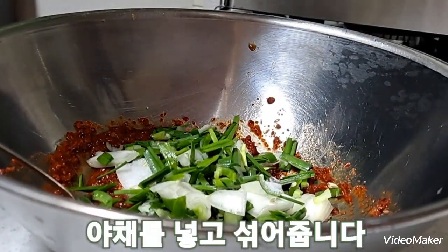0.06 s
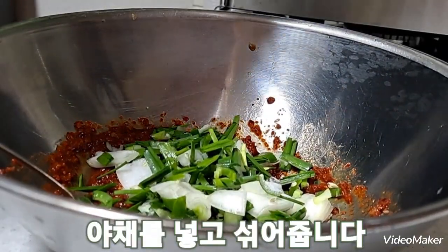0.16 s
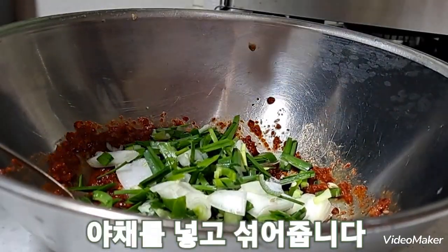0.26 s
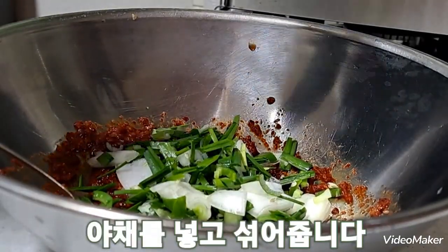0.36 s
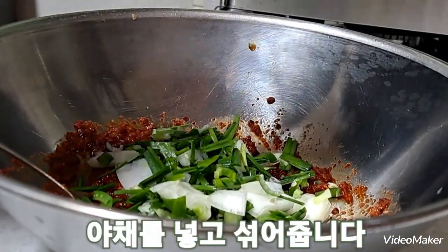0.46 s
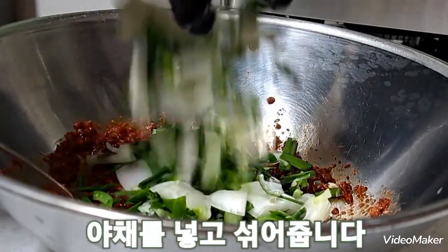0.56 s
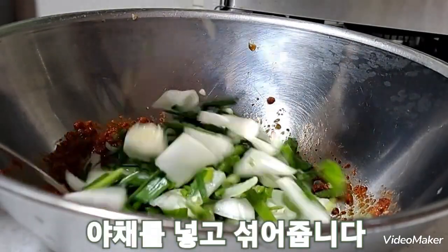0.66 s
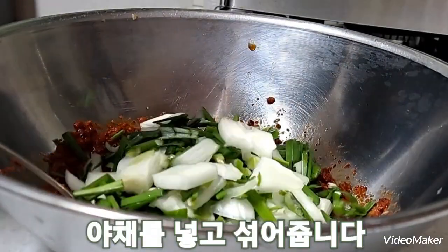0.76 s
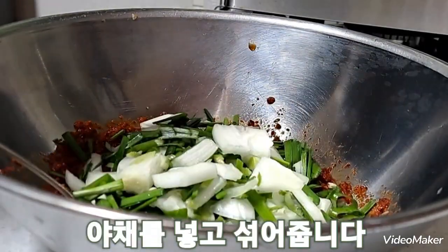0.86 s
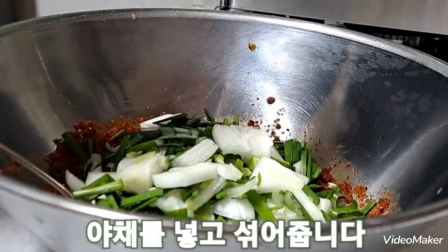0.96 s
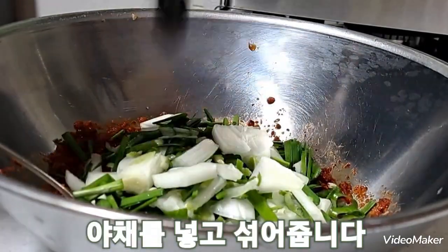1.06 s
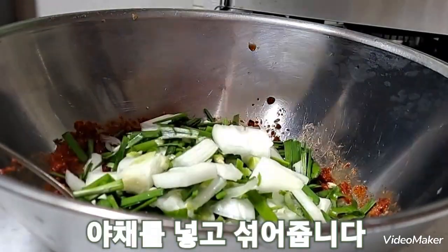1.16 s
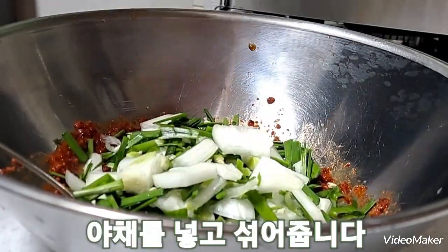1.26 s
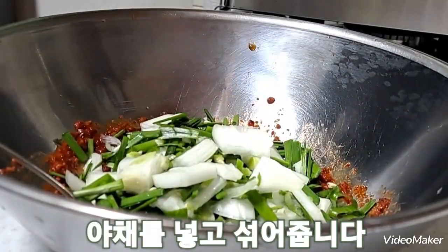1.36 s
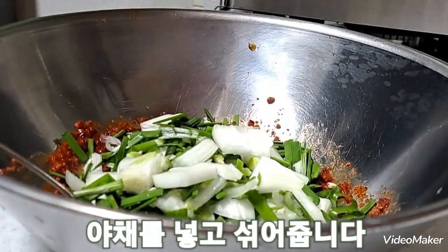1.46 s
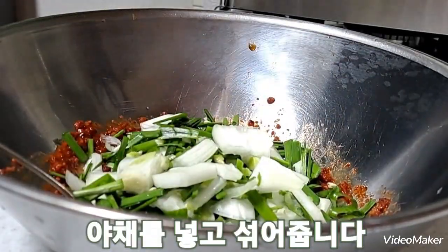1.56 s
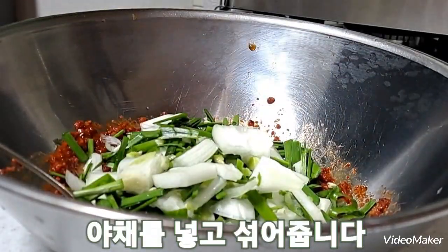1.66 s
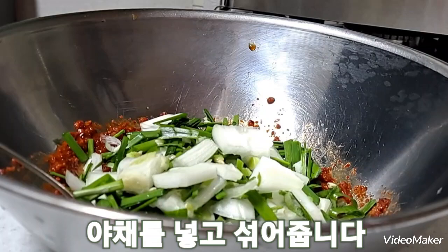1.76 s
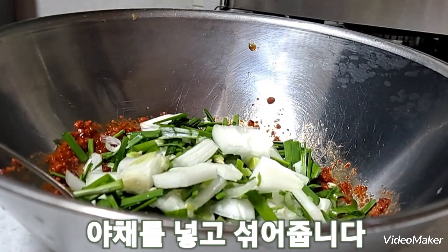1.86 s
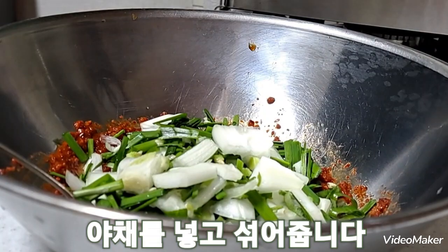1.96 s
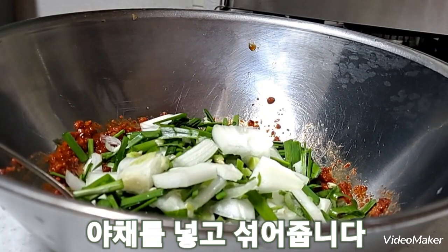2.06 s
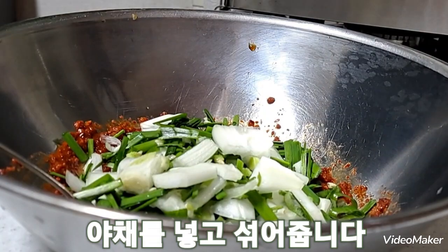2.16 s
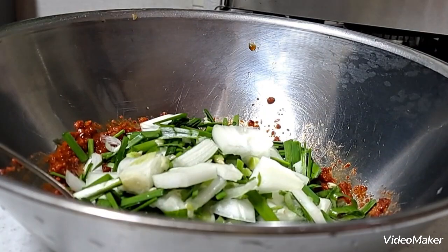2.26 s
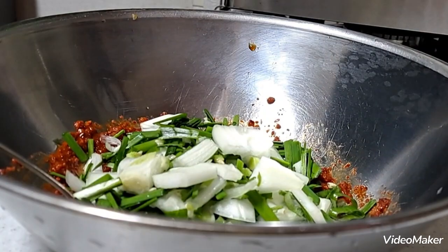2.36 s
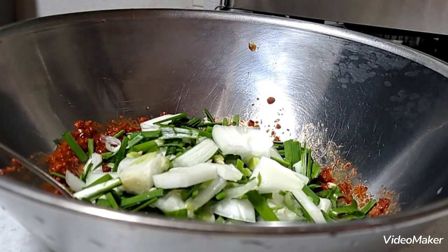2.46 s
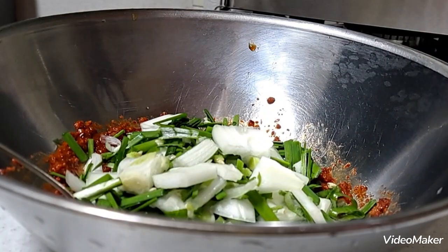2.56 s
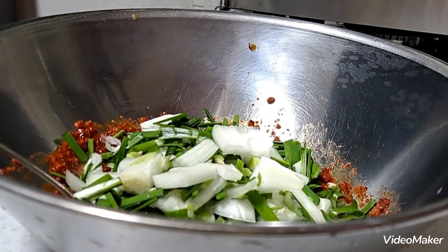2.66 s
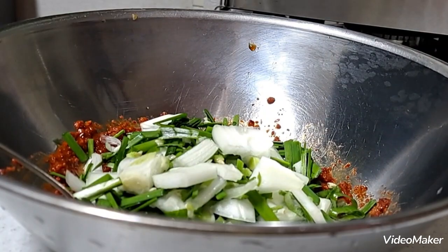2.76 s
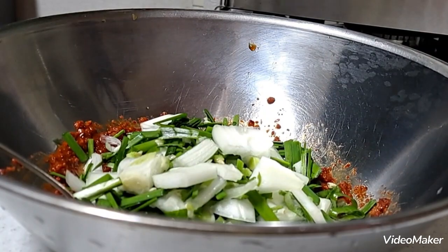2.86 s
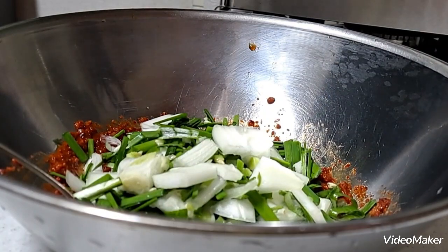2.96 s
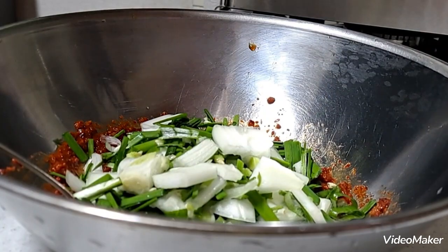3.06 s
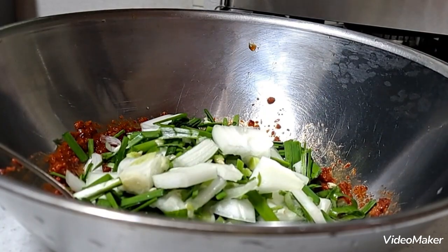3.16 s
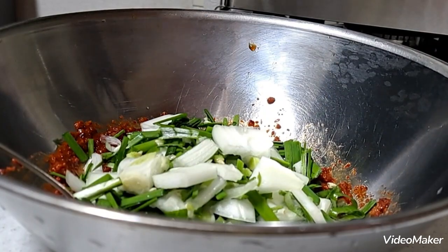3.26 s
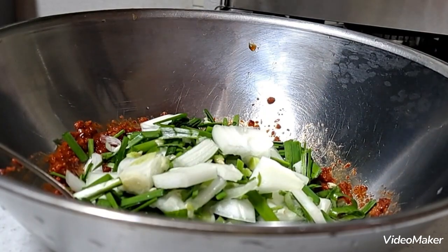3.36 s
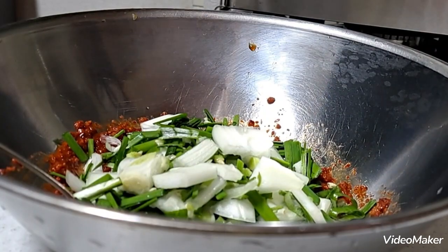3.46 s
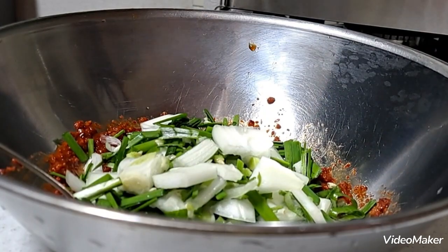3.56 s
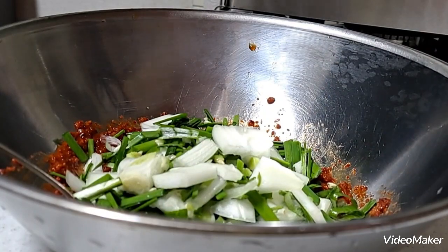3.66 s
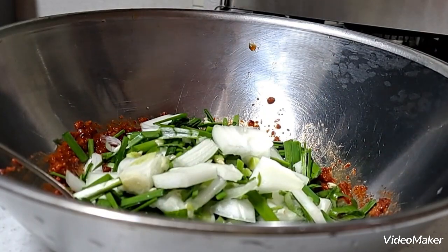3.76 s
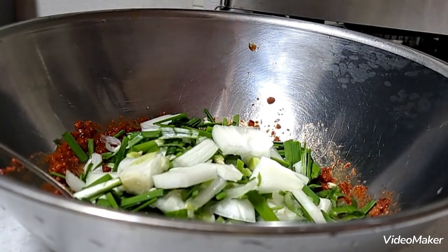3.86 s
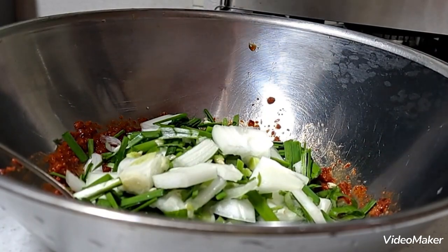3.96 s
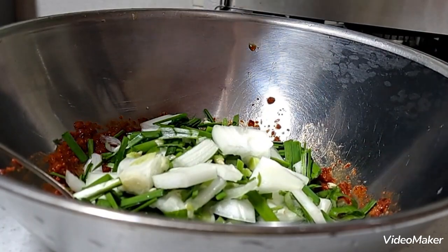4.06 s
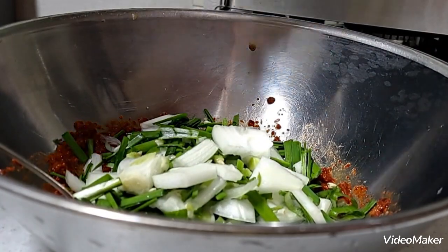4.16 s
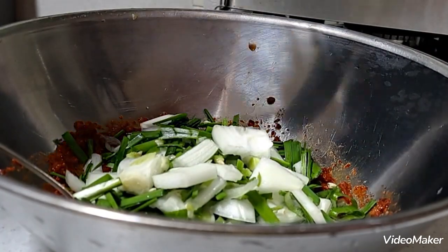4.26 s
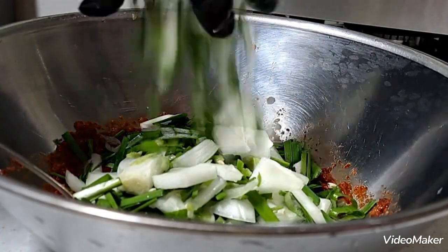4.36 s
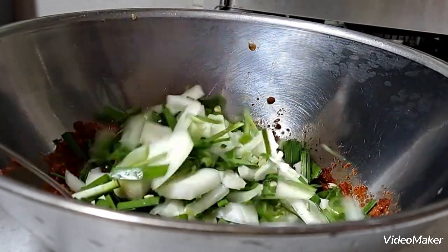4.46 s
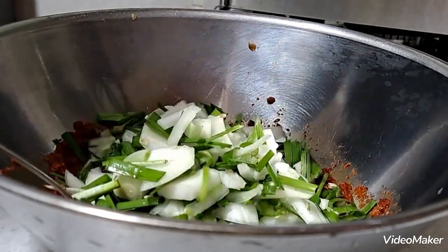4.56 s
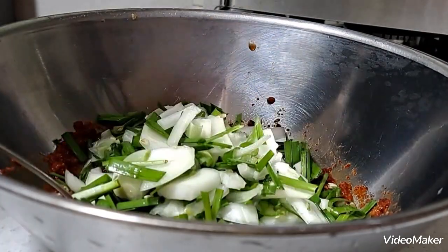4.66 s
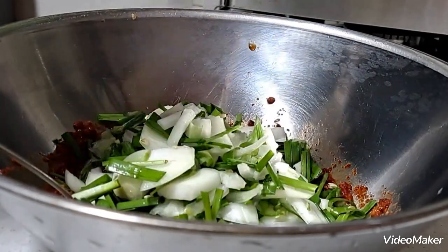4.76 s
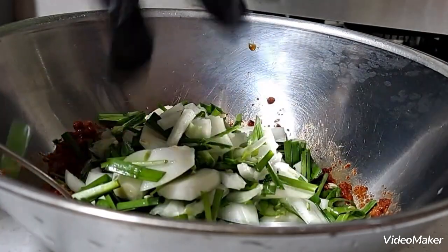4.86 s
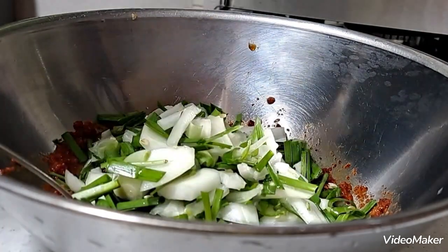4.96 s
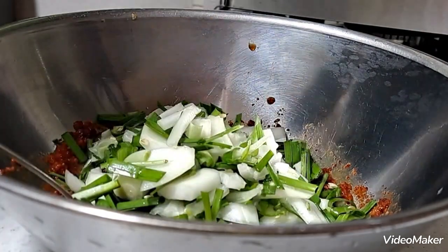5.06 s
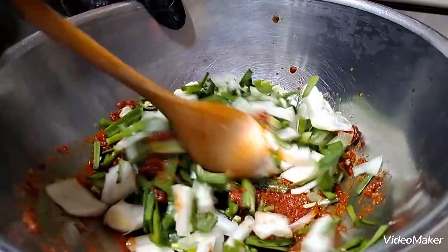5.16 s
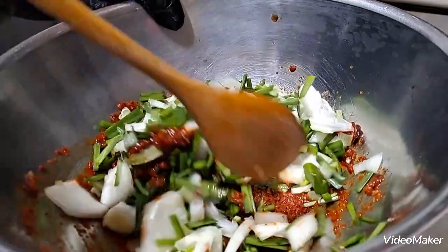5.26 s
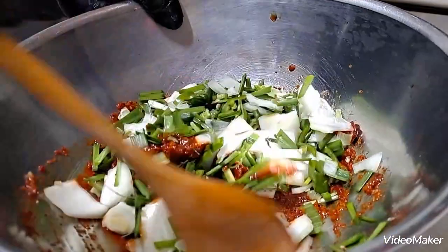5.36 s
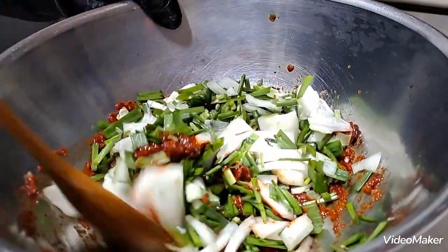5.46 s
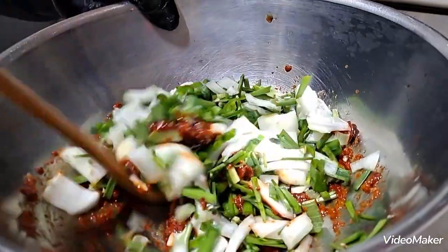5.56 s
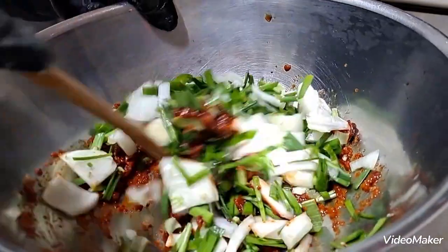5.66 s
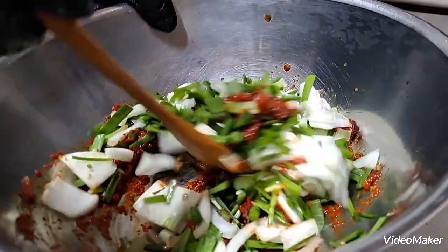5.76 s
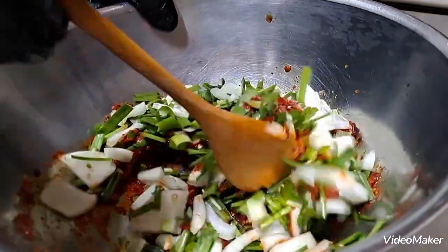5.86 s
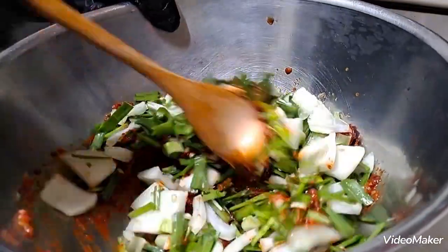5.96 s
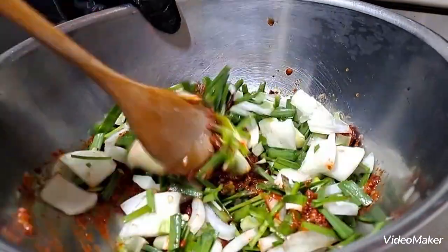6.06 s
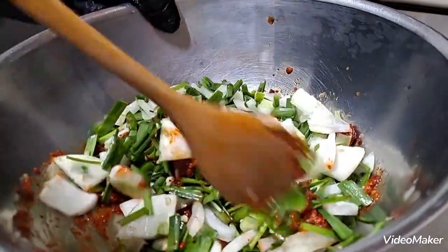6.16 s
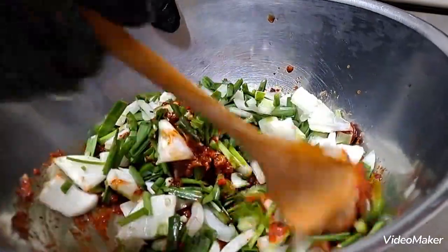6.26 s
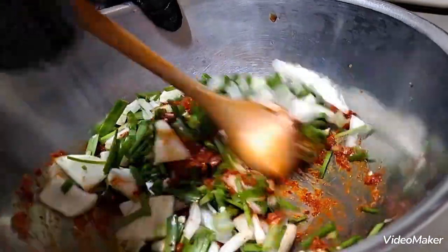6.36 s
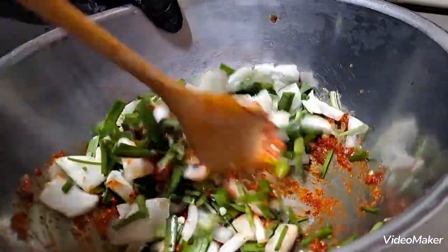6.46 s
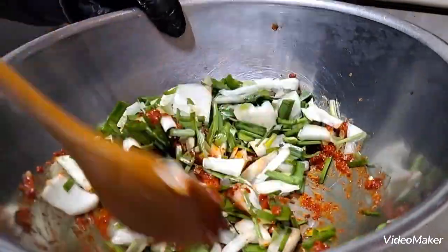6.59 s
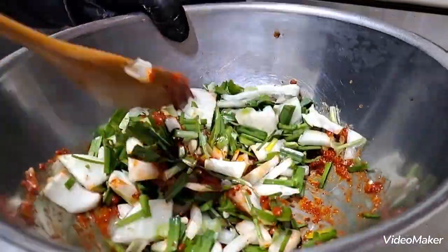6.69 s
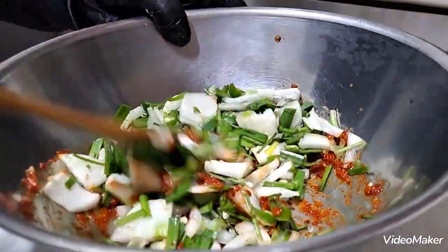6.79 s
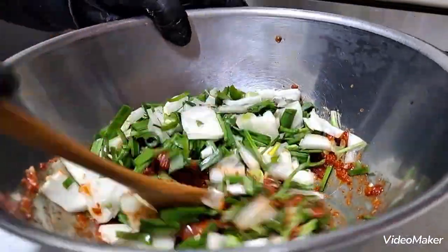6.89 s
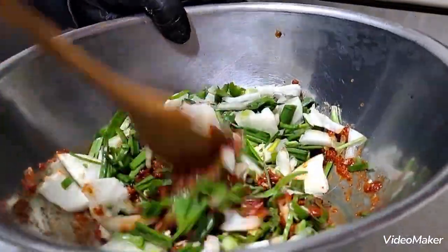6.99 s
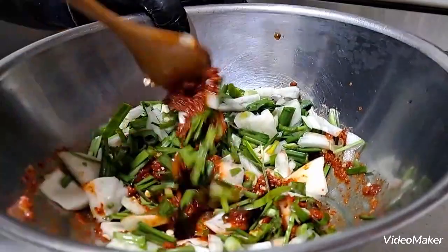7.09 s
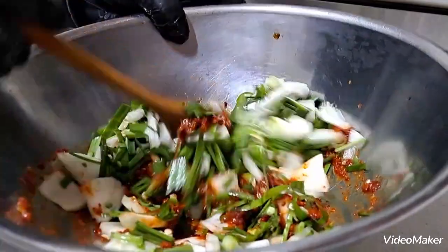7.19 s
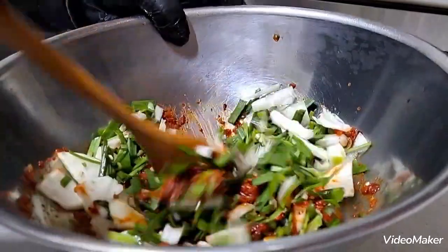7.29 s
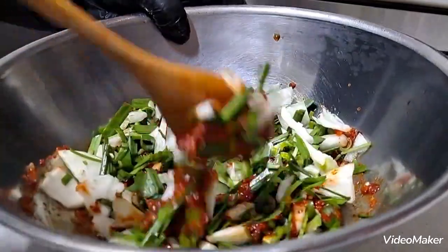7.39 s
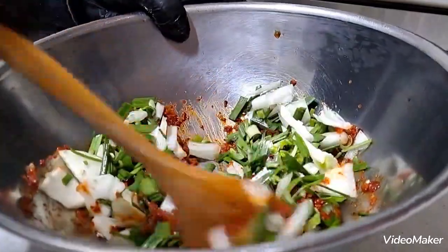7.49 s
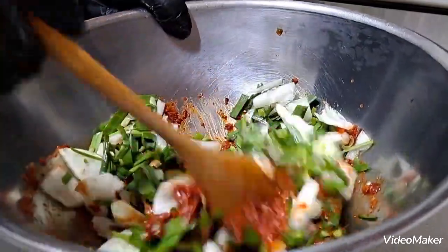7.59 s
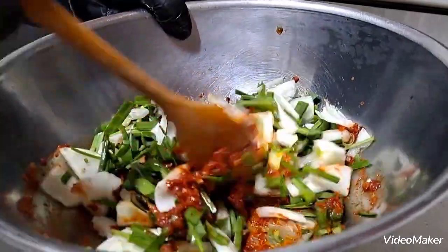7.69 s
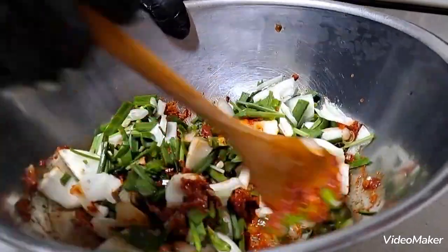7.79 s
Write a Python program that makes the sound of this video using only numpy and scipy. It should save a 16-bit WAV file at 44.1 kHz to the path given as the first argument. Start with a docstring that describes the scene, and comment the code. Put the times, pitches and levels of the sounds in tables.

```python
"""Small kitchen, stereo microphones close to a steel bowl right of centre, a fan steady in the room.
First, chopped onion and chives slide off a board in grainy noise and land by the handful with thuds;
a metal spoon clinks on the wall in short high modes. The level dips briefly, then a wooden spoon
tosses the food through wet seasoning: crunch, hiss and drag noise, with knocks that ring the bowl."""
import sys
import numpy as np
from scipy import signal
from scipy.fft import rfft, irfft, next_fast_len
from scipy.io import wavfile
from scipy.ndimage import uniform_filter1d

SR = 44100
rng = np.random.default_rng(int(sys.argv[2]) if len(sys.argv) > 2 else 0)


def materialize(psi):
    """Save the field psi as 16-bit PCM at rate SR to the path in sys.argv[1].

    A 1-D psi becomes a single channel; in a 2-D psi each row is a channel.
    """
    bounded = np.clip(np.atleast_2d(psi).T, -1, 1)
    quanta = np.round(bounded * 32767).astype(np.int16)
    wavfile.write(sys.argv[1], SR, quanta)


N = 345303  # length in samples

# Wooden spoon in the bowl. Each row: start in seconds, rise in seconds, hold in seconds,
# crunch level in dB before trim, hiss above the crunch in dB, drag on the steel in dB before trim.
STROKES = [(5.055, 0.12, 0.049, -39.5, 0, -38.0), (5.408, 0.015, 0.088, -47, -6, -29.5),
           (5.441, 0.074, 0.05, -39.5, 3.3, -29.5), (5.569, 0.08, 0.12, -36.5, -3, -46.5),
           (5.784, 0.048, 0.065, -51, 4, -37), (5.948, 0.071, 0.062, -49.5, 4, -66),
           (6.109, 0.13, 0.096, -52.5, 9, -67), (6.273, 0.036, 0.15, -42.8, 3, -36),
           (6.526, 0.13, 0.085, -49.5, 7, -51), (6.8, 0.089, 0.069, -40.0, 4, -44),
           (7.003, 0.04, 0.027, -50, -5, -67), (7.157, 0.08, 0.11, -38, -4.5, -39.5),
           (7.542, 0.024, 0.063, -41.5, 5, -29), (7.642, 0.042, 0.042, -42.5, -4.3, -41.5),
           (7.778, 0.039, 0.02, -49.5, 2, -50.0)]
# Colour of the wet food. Each row: frequency in Hz, relative density in dB per Hz.
WET_SPECTRUM = [(290, -12.5), (500, -1), (1000, -13), (1500, -6), (2600, -2.5), (4200, -6.5), (6500, -6),
                (8300, -6), (10000, -14), (12500, -7.5), (16000, -18)]
# Stereo spread of the wet food. Each row: frequency in Hz, left-right likeness (1 is mono).
WET_ALIKE = [(300, 0.91), (640, 0.13), (1500, 0.081), (3000, 0.039), (6800, 0.49), (15000, 0.85)]
# Colour of wood rubbing on steel. Each row: frequency in Hz, relative density in dB per Hz.
DRAG_SPECTRUM = [(18, -56), (30, -26), (112, -10.5), (152, -15), (176, -13), (194, -4.5), (235, -10),
                 (285, -14.5), (346, -9.5), (393, -21.5), (477, -14), (637, -15), (892, -23), (1170, -20.5),
                 (1400, -30), (1820, -55), (3080, -120)]
# Stereo spread of the bowl, for the drag and the handfuls. Each row: frequency in Hz, left-right likeness.
BOWL_ALIKE = [(60, 0.66), (160, 1), (640, 0.27), (1500, 0.12), (3000, 0.067), (6800, 0.58), (15000, 0.93)]
# Path of the spoon across the stereo picture. Each row: time in seconds, lean to the right in dB.
SPOON_SIDE = [(5.1, 3.5), (5.55, 2.5), (5.65, 1.5), (6.2, 1), (6.35, 3), (6.6, 1.5), (7.1, 1), (7.25, 3),
              (7.83, 3)]


def stirring():
    """The wooden spoon turns wet vegetables over and rubs the steel; the heap settles in between."""
    start_s = 5.11
    fall_db_per_s, drag_fall_db_per_s, linger_s = 249.5, 297, 0.11
    settle_crunch_db, settle_hiss_db, settle_drag_db = -71, -63.5, -56  # the heap between strokes, before trim
    rows, t = np.array(STROKES), np.arange(N) / SR
    timing, (db, hiss_db, drag_db) = rows[:, :3], rows[:, 3:].T
    crunch = np.hypot(pushes(timing, db, fall_db_per_s, linger_s), amp(settle_crunch_db))
    hiss = np.hypot(pushes(timing, db + hiss_db, fall_db_per_s, linger_s), amp(settle_hiss_db))
    drag = np.hypot(pushes(timing, drag_db, drag_fall_db_per_s, linger_s), amp(settle_drag_db))

    pieces = patchy(grains(rate=1500, spread_db=3, smooth_db=4.0), depth_db=2.5)
    texture = coloured(pieces, WET_SPECTRUM, WET_ALIKE)

    # the hiss swings 2.3 times wider than the crunch, and is centred where the spoon leans 1.5 dB
    lean_db = np.interp(t, *np.transpose(SPOON_SIDE))
    hiss_lean_db = 2.3 * (lean_db - 1.5)
    crunch = crunch * amp([-lean_db / 2, lean_db / 2])
    hiss = hiss * amp([-hiss_lean_db / 2, hiss_lean_db / 2])
    food = amp(-0.27) * rustle(texture, crunch, hiss, split_hz=5000)

    rubbing = coloured(rng.standard_normal((2, N)), DRAG_SPECTRUM, BOWL_ALIKE)
    return (food + placed(amp(-1.5) * drag * rubbing, right_db=5.5)) * (t > start_s)


# Dull blows on the bowl. Each row: time in seconds, level in dB for the whole blow, contact pitch in Hz,
# ring of the bowl in dB before trim, crack in dB before its band-pass.
KNOCKS = [(0.781, -23.5, 790, -2, -24), (0.7958, -24.5, 690, -7, -15), (1.124, -36, 770, 3, -15),
          (4.507, -21.5, 650, -0.5, -15), (5.4197, -4.5, 867, 0.5, -0.5), (5.527, -19.5, 500, -3, -15),
          (5.7536, -21, 460, 8.5, -13), (5.83, -19.5, 490, -4, -12.5), (5.8782, -16.5, 920, -4, -6),
          (6.32, -7, 608, -7, -27), (6.388, -19.5, 600, -2, -14.5), (6.612, -29.5, 1210, -0.5, -11),
          (6.664, -31, 770, 1, -15), (7.2305, -13.5, 770, 4.5, -11), (7.347, -20, 560, 0, 5),
          (7.38, -23, 680, 2, -15), (7.5956, -12, 704, -0.5, -22), (7.779, -32.5, 620, 5, -9)]
# Modes of the loaded bowl. Each row: frequency in Hz, relative level in dB, time to fall 60 dB in seconds.
BOWL_MODES = [(136, -9, 0.42), (194, -0.5, 0.21), (314, -13, 0.14), (448, -7.5, 0.15), (494, -4.5, 0.27),
              (580, -18, 0.15), (622, -5, 0.19), (790, -31, 0.19), (874, -9.5, 0.27), (971, -3.5, 0.14),
              (1147, -3, 0.16), (1396, -16, 0.39), (1540, -16, 0.25), (1577, -6.5, 0.22),
              (2850, -0.5, 0.28), (2980, -9, 0.25)]


def knocks():
    """A blow flexes the wall for a few cycles; the food damps the ring that follows."""
    out, t = np.zeros((2, N)), np.arange(SR // 4) / SR
    for s, db, hz, ring_db, crack_db in KNOCKS:
        # 8 / hz: the flexing falls 60 dB in eight cycles
        flex = np.sin(2 * np.pi * hz * t) * decay(t, 8 / hz) * (1 - decay(t, 1.66 / hz))
        noise = rng.standard_normal(len(t)) * decay(t, 0.0062)
        crack = amp(crack_db) * band(noise, low_hz=1100, high_hz=2930)
        modes = amp(ring_db - 21.0) * ring(BOWL_MODES, t, 1.34 * hz, vary_db=3.5, blur=0.007)
        blow = 1.34 * band(flex, low_hz=160, high_hz=6000) + crack + modes
        add(out, s, amp(db) * in_kitchen(blow, right_db=11.0, near_db=-6.5, near_t60=0.032, room_db=-5))
    return out


# Metal spoon on the wall. Each row: time in seconds, level in dB for the whole clink, contact pitch in Hz.
CLINKS = [(0.79, -13.5, 6720), (0.842, -27.5, 7450), (1.1247, -22.5, 6850), (1.944, -27, 6800),
          (4.506, -16, 6180), (4.5594, -16, 6960), (4.9768, -25, 6220), (6.636, -24, 7540),
          (7.5583, -12.5, 5870)]
# Modes of spoon on wall. Each row: frequency in Hz, relative level in dB, time to fall 60 dB in seconds.
STEEL_MODES = [(2980, -20, 0.094), (5240, -13, 0.17), (6210, -1, 0.1), (6550, 3.5, 0.1), (6700, -16, .14),
               (7100, -1.5, .15), (7200, -15, 0.11), (7800, -12, 0.1), (7940, -6, 0.13),
               (8700, -0.5, 0.091), (10900, -11, .1), (11700, -8, 0.072), (13040, -16, .08)]


def clinks():
    """Steel on steel: a bright tick and a cluster of short high modes; strong clinks strike again."""
    out, t = np.zeros((2, N)), np.arange(SR // 5) / SR
    # clinks above -18 dB rebound 4.5 ms later, weaker and a little higher
    rebounds = [(s + 0.0045, db - 4.5, hz * 1.08) for s, db, hz in CLINKS if db > -18]
    for s, db, hz in CLINKS + rebounds:
        tick = np.sin(2 * np.pi * hz * t) * decay(t, 0.01) * (1 - decay(t, 0.0025))
        noise = rng.standard_normal(len(t)) * decay(t, 0.02)
        chatter = amp(2.5) * band(noise, low_hz=0.993 * hz, high_hz=1.216 * hz)
        crack = amp(-27) * rng.standard_normal(len(t)) * decay(t, 0.005)
        modes = amp(-18.5) * ring(STEEL_MODES, t, 2.8 * hz, vary_db=1.5, blur=0.0053)
        blow = tick + chatter + crack + modes
        add(out, s, amp(db) * in_kitchen(blow, right_db=8.5, near_db=-3.0, near_t60=0.034, room_db=-9.5))
    return out


# Handfuls landing in the bowl. Each row: start in seconds, rise in seconds, hold in seconds,
# crunch level in dB before trim, hiss above the crunch in dB, thud level in dB before trim.
HANDFULS = [(0.593, 0.087, 0.036, -36.5, -3.5, -36.5), (0.765, 0.02, 0.002, -54.5, 12.5, -37),
            (4.42, 0.077, 0.016, -37, -0.2, -34), (4.53, 0.026, 0.006, -42, 0, -40.0)]
# Colour of the falling greens. Each row: frequency in Hz, relative density in dB per Hz.
LEAVES_SPECTRUM = [(290, -28), (500, -14), (740, -20), (1020, -15.5), (1190, 0), (1640, -8), (2160, -2.5),
                   (3700, -5.5), (8580, -4), (10100, -15), (11600, -6), (14700, -11.5), (16000, -26)]
# Colour of the thud on the bowl. Each row: frequency in Hz, relative density in dB per Hz.
THUD_SPECTRUM = [(18, -45), (30, -21), (124, 1.5), (213, -6), (281, -9), (538, -13.5), (647, -7.5),
                 (1010, -18.5), (1200, -12), (1560, -41), (2640, -120)]


def handfuls():
    """Pieces patter onto the heap and thud on the bowl beneath it."""
    fall_db_per_s, thud_fall_db_per_s, linger_s = 446, 330, 0.057
    rows = np.array(HANDFULS)
    timing, (db, hiss_db, thud_db) = rows[:, :3], rows[:, 3:].T
    crunch = pushes(timing, db, fall_db_per_s, linger_s)
    hiss = pushes(timing, db + hiss_db, fall_db_per_s, linger_s)
    thud = pushes(timing, thud_db, thud_fall_db_per_s, linger_s)
    pieces = patchy(grains(rate=1500, spread_db=3.0, smooth_db=2), depth_db=3)
    texture = coloured(pieces, LEAVES_SPECTRUM, BOWL_ALIKE)
    patter = amp(-1.5) * rustle(texture, crunch, hiss, split_hz=3700)
    body = coloured(rng.standard_normal((2, N)), THUD_SPECTRUM, BOWL_ALIKE)
    return placed(patter + amp(-4.0) * thud * body, right_db=6.5)


# Pushes of greens over the board. Each row: start in seconds, rise in seconds, hold in seconds,
# crunch level in dB before trim, hiss above the crunch in dB.
SWEEPS = [(0.314, 0.209, 0.11, -78.5, 24.2), (0.99, 0.04, 0.095, -55, 6), (1.557, 0.055, 0.21, -61, -1.3),
          (1.846, 0.11, 0.002, -43.5, -0.5), (2.196, 0.14, 0.061, -55, 0), (2.665, 0.098, 0.016, -48, -4.8),
          (2.771, 0.049, 0.002, -39, -3), (3.298, 0.22, 0.061, -51.5, 0.8), (3.748, 0.092, 0.077, -72.1, 1),
          (4.212, 0.16, 0.082, -66, 12.5), (4.787, 0.061, 0.002, -46.5, 6)]
# Colour of greens on the board. Each row: frequency in Hz, relative density in dB per Hz.
BOARD_SPECTRUM = [(410, -24), (700, -17), (997, -18), (1400, -7.5), (1730, -14), (2100, -11), (2530, -12),
                  (2990, -2.5), (3600, -9.5), (4920, -2), (6150, -4), (7200, 0.5), (9350, -6.5),
                  (13100, -4.5), (16000, -15)]
# Stereo spread of the board. Each row: frequency in Hz, left-right likeness.
BOARD_ALIKE = [(640, 0.26), (3000, 0.067), (6800, 0.68), (15000, 0.93)]


def sweeps():
    """Chopped greens slide over the board as they are gathered."""
    fall_db_per_s, linger_s = 189, 0.45
    rows = np.array(SWEEPS)
    timing, (db, hiss_db) = rows[:, :3], rows[:, 3:].T
    crunch = pushes(timing, db, fall_db_per_s, linger_s)
    hiss = pushes(timing, db + hiss_db, fall_db_per_s, linger_s)
    pieces = patchy(grains(rate=1500, spread_db=2.5, smooth_db=4.0), depth_db=3.0)
    texture = coloured(pieces, BOARD_SPECTRUM, BOARD_ALIKE)
    return placed(amp(-1.0) * rustle(texture, crunch, hiss, split_hz=5260), right_db=4.5)


# Crisp pieces snapping. Each row: time in seconds, level in dB before the band-pass and echoes.
SNAPS = [(0.647, -28.5), (4.462, -26), (4.482, -27), (5.566, -20.5), (6.139, -30.5), (6.384, -21.5),
         (6.866, -25.5), (7.055, -31.5), (7.202, -27.5)]


def snaps():
    """Single stalks crack with a dry, wide tick."""
    out, t = np.zeros((2, N)), np.arange(SR // 5) / SR
    for s, db in SNAPS:
        noise = rng.standard_normal(len(t)) * decay(t, 0.0044)
        tick = band(noise, low_hz=2570, high_hz=14200)
        add(out, s, amp(db) * in_kitchen(tick, right_db=9.5, near_db=4, near_t60=0.025, room_db=-22))
    return out


# The bowl rocking on the counter. Each row: time in seconds, level in dB before a 7.5 dB lift, pitch in Hz.
THUMPS = [(0.703, -30.5, 92), (4.51, -28.5, 185), (5.517, -18.5, 200), (5.533, -14.5, 192),
          (5.57, -21.5, 195), (5.756, -25.5, 230), (5.833, -26, 213), (5.881, -26, 204), (6.323, -26, 151),
          (6.41, -30, 188), (7.561, -16.5, 204), (7.577, -18.5, 143)]


def thumps():
    """The base of the bowl rocks on the counter with a short boom."""
    out, t = np.zeros(N), np.arange(SR // 4) / SR
    for s, db, hz in THUMPS:
        boom = np.sin(2 * np.pi * hz * t) * decay(t, 0.083) * (1 - decay(t, 0.037)) ** 2
        add(out, s, amp(db + 7.5) * boom)
    return placed(out, right_db=5.0)


# A faint rubbing tone, well to the right. One row: pitch in Hz, level in dB before the lean.
SQUEAK = (628, -62)


def squeak():
    """A short tone whose wandering phase makes it slightly unsteady."""
    start_s, end_s = 3.405, 3.51
    hz, db = SQUEAK
    t = np.arange(N) / SR
    progress = np.clip((t - start_s) / (end_s - start_s), 0, 1)
    gain = np.sqrt(np.abs(np.sin(np.pi * progress)))
    drift = np.cumsum(rng.standard_normal(N)) * 0.024
    return placed(amp(db) * gain * np.sin(2 * np.pi * hz * t + drift), right_db=14)


# Colour of the fan's air. Each row: frequency in Hz, relative density in dB per Hz.
FAN_SPECTRUM = [(15, -55), (25, -14.5), (123, -0.5), (153, -10), (236, -7), (277, -9.5), (363, -10.5),
                (463, -12.5), (607, -18), (936, -22), (1040, -19), (1400, -22.5), (5880, -29),
                (8140, -23.5), (16000, -32.5)]
# Stereo spread of the fan. Each row: frequency in Hz, left-right likeness.
FAN_ALIKE = [(60, 0.48), (130, 0.51), (290, 0.53), (640, 0.17), (3000, 0), (6800, 0.91), (15000, 1)]


def fan():
    """Steady air noise with a weak motor hum, behind everything."""
    air = amp(-58.0) * coloured(rng.standard_normal((2, N)), FAN_SPECTRUM, FAN_ALIKE)
    hum_hz = 120
    hum = amp(-67.5) * np.sin(2 * np.pi * hum_hz * np.arange(N) / SR)
    return placed(air + hum, right_db=4.5)


# Tail of the small kitchen. Each row: frequency in Hz, time to fall 60 dB in seconds.
KITCHEN = [(150, 0.37), (1000, 0.26), (7000, 0.33), (15000, 0.11)]


def in_kitchen(x, right_db, near_db, near_t60, room_db):
    """A blow, its quick echoes inside the bowl and the tail of the room."""
    t = np.arange(len(x)) / SR
    hz, s, z = signal.stft(rng.standard_normal((2, len(x))), SR, nperseg=256)
    fading = z * decay(s, along(KITCHEN, hz)[:, None])
    tail = signal.istft(fading, SR, nperseg=256)[1][:, :len(x)]
    tail = tail * (1 - decay(t, 0.035))  # the room answers gradually
    tail = amp(room_db) * tail / np.linalg.norm(tail[0])
    near = rng.standard_normal((2, len(x))) * decay(t, near_t60) * (t > 0.002)
    near = amp(near_db) * near / np.linalg.norm(near[0])
    echoes = placed(near, right_db) + placed(tail, right_db=3.5)
    return placed(x, right_db) + signal.fftconvolve(x[None], echoes, axes=1)[:, :len(x)]


def ring(modes, t, contact_hz, vary_db, blur):
    """Modes at fresh strengths, less above the contact pitch; chatter blurs each by a share of its frequency."""
    hz, db, t60 = np.transpose(modes)[:, :, None]
    luck, side = rng.standard_normal((2, len(modes), 1))
    steps = rng.standard_normal((len(modes), len(t)), dtype=np.float32)
    drift = np.cumsum(steps, 1) * np.sqrt(2 * np.pi * blur * hz / SR)
    strength = np.sign(side) * amp(db + vary_db * luck) / np.sqrt(1 + (hz / contact_hz) ** 4)
    tones = np.sin(np.float32(2 * np.pi * hz * t + drift))
    return np.sum(strength * tones * decay(t, t60), 0)


def grains(rate, spread_db, smooth_db, size=24):
    """Tiny snaps (rate per second, size in samples) of random pitch and strength on rubbing noise."""
    count = int(rate * N / SR)
    k = np.arange(size)
    pair = []
    for _ in range(2):
        when, pitch, phase, luck = rng.random((count, 4)).T[:, :, None]
        strength = amp(spread_db * np.minimum(-np.log(1 - luck), 5))  # a few snaps are much stronger
        bursts = strength * np.sin(np.pi * (pitch * k + 2 * phase)) * (1 - k / size) ** 2
        places = (when * N).astype(int) + k
        x = np.bincount(places.ravel(), bursts.ravel(), N + size)[:N]
        pair.append(x / rms(x) + amp(smooth_db) * rng.standard_normal(N))
    return np.array(pair)


def patchy(pair, depth_db):
    """Pieces shift about, so the colour changes from moment to moment."""
    z = signal.stft(pair, nperseg=512)[2]
    field = uniform_filter1d(rng.standard_normal(z.shape[1:]), size=4, axis=0)  # across frequency
    field = uniform_filter1d(field, size=9, axis=1)  # across time
    return signal.istft(z * amp(depth_db * field / rms(field)), nperseg=512)[1][:, :N]


def rustle(texture, crunch, hiss, split_hz):
    """Firm pieces crunch below the split; thin wet leaves hiss above it."""
    low = filtered(texture, lambda hz: 1 / (1 + (hz / split_hz) ** 4))
    mid = texture.mean(0)
    # each gain is relative to the texture's strength in its own reference band
    crunch_size = rms(filtered(mid, lambda hz: (hz > 1500) & (hz < 5000)))
    hiss_size = rms(filtered(mid, lambda hz: (hz > 9500) & (hz < 15500)))
    return low * crunch / crunch_size + (texture - low) * hiss / hiss_size


def swell(start, rise, hold, fall_db_per_s, linger_s):
    """A push builds, holds and dies away ever more slowly; the rate of fall halves after linger_s."""
    t = np.arange(N) / SR - start
    release = linger_s * np.log1p(np.maximum(t - rise - hold, 0) / linger_s)
    return np.clip(t / rise, 0, 1) ** 2 * amp(-fall_db_per_s * release)


def pushes(timing, levels_db, fall_db_per_s, linger_s):
    """The joint gain of several pushes, each timed as (start, rise, hold); they add in power."""
    power = 0
    for when, db in zip(timing, levels_db):
        power = power + (amp(db) * swell(*when, fall_db_per_s, linger_s)) ** 2
    return np.sqrt(power)


def coloured(pair, spectrum, alike):
    """Two unrelated signals become stereo with this spectrum and likeness, its mid at rms 1."""
    def response(hz):
        turn = np.arccos(np.clip(along(alike, hz), -1, 1)) / 2
        return amp(along(spectrum, hz)) * [np.cos(turn), np.sin(turn)]
    mid, side = filtered(pair, response)
    return np.array([mid + side, mid - side]) / rms(mid)


def placed(x, right_db):
    """Lean a sound to the right."""
    return x * amp([[-right_db / 2], [right_db / 2]])


def add(track, s, sound):
    """Mix a sound into the track at s seconds."""
    part = track[..., round(s * SR):][..., :sound.shape[-1]]
    part += sound[..., :part.shape[-1]]


def decay(t, t60):
    """A fall of 60 dB in t60 seconds."""
    return np.exp(-np.log(1000) * t / t60)


def band(x, low_hz, high_hz):
    """A gentle causal band-pass."""
    return signal.sosfilt(signal.butter(2, [low_hz, high_hz], "band", fs=SR, output="sos"), x)


def filtered(x, response):
    """x times a response of frequency."""
    m = next_fast_len(N + 8192)  # padded so that the end does not wrap onto the start
    return irfft(rfft(x, m) * response(np.fft.rfftfreq(m, 1 / SR)), m)[..., :N]


def along(points, hz):
    """Interpolate (Hz, value) points on a log frequency axis."""
    f, v = np.transpose(points)
    return np.interp(np.log(hz + 1), np.log(f + 1), v)


def amp(db):
    """Decibels to gain."""
    return 10 ** (np.asarray(db) / 20)


def rms(x):
    """Root mean square."""
    return np.sqrt(np.mean(x ** 2) + 1e-20)


def scene():
    """Everything heard at the bowl."""
    food = stirring() + handfuls() + sweeps() + snaps()
    bowl = knocks() + clinks() + thumps()
    return food + bowl + squeak() + fan()


# Overall level around the brief dip. Each row: time in seconds, gain in dB.
FADE = [(5.02, 1.5), (5.08, -6), (5.103, -25), (5.118, -3.5), (5.139, -1)]


def record(dry):
    """The level dips briefly as the stirring begins; a steep low-pass limits the treble."""
    top_hz = 16100
    fade = amp(np.interp(np.arange(N) / SR, *np.transpose(FADE)))
    return filtered(dry * fade, lambda hz: 1 / np.sqrt(1 + (hz / top_hz) ** 200))


dry = scene()
out = record(dry)
materialize(out)
```